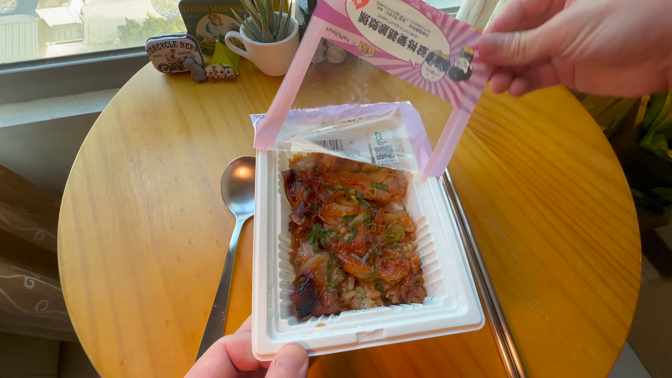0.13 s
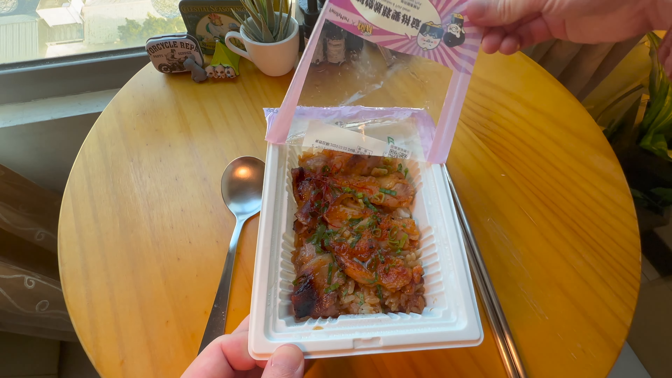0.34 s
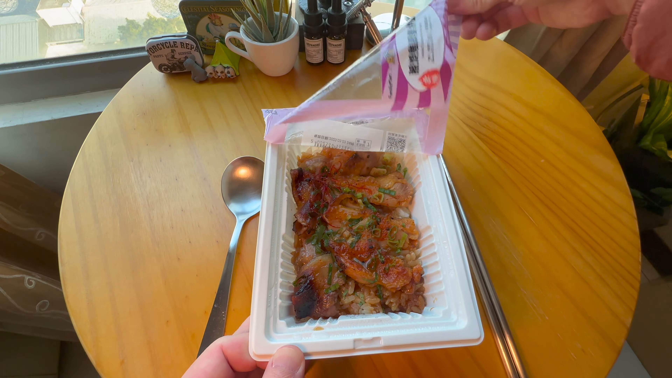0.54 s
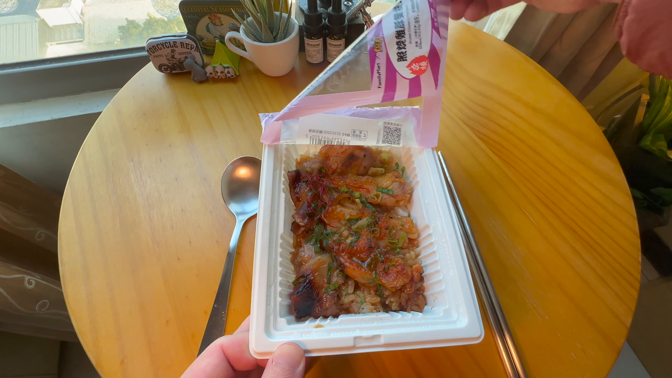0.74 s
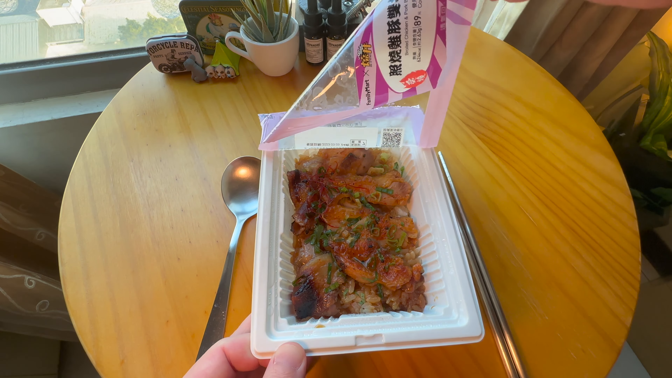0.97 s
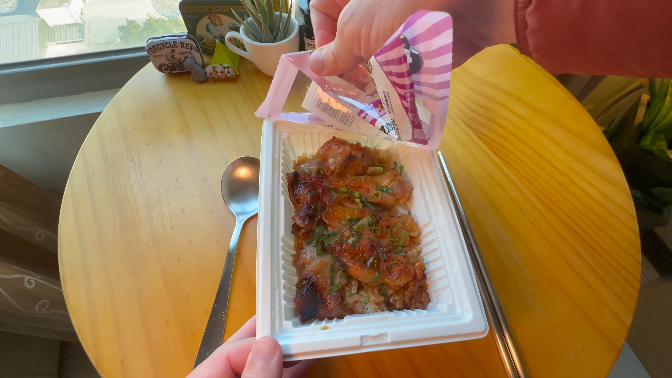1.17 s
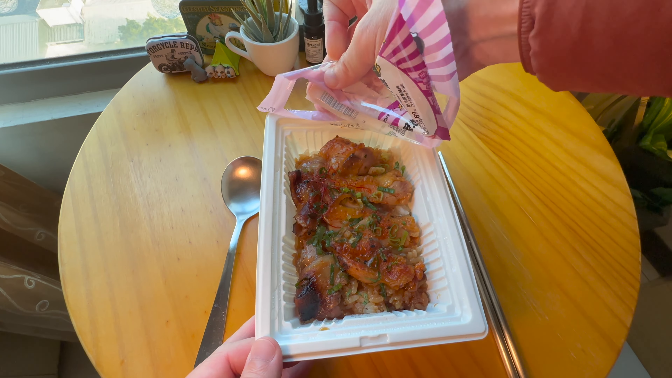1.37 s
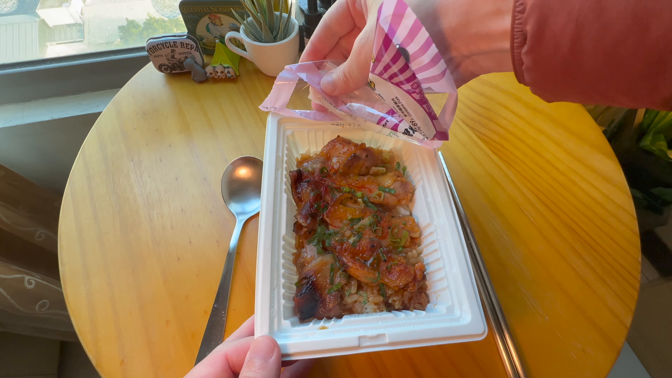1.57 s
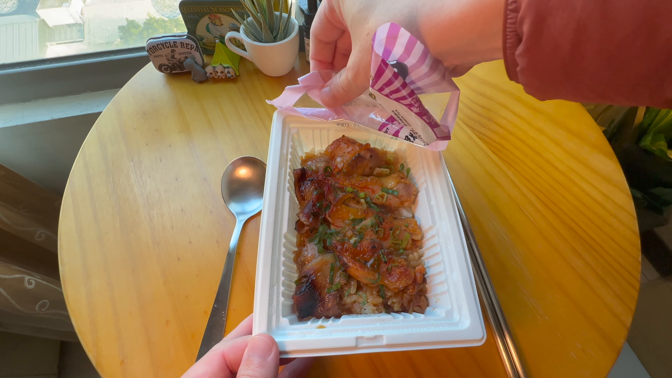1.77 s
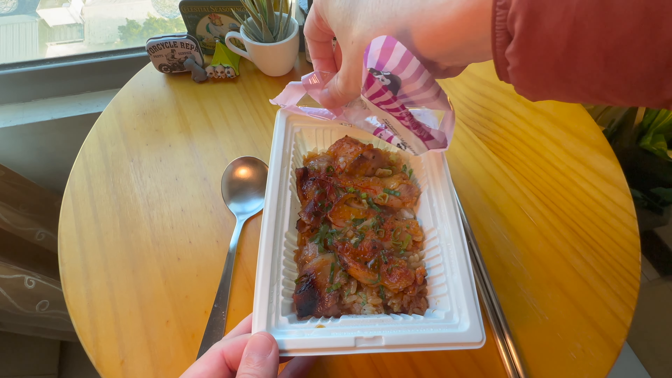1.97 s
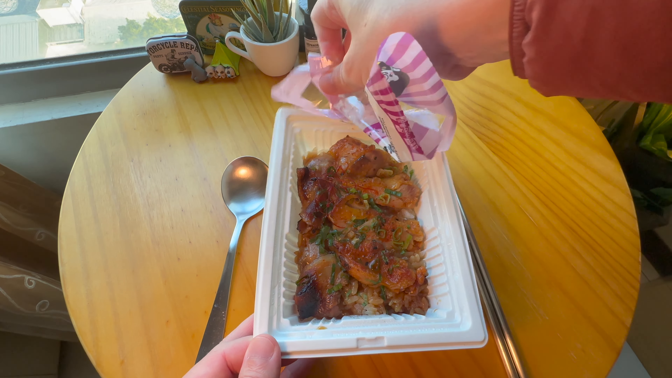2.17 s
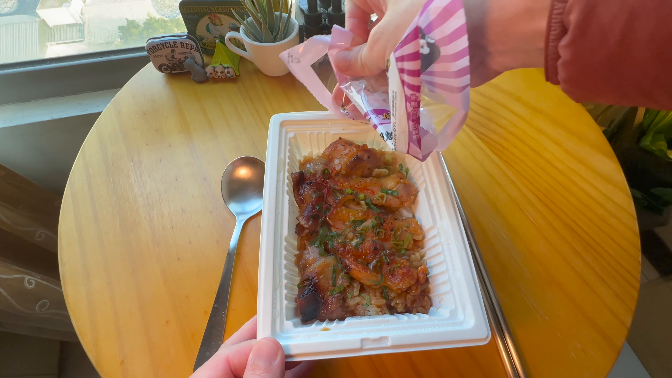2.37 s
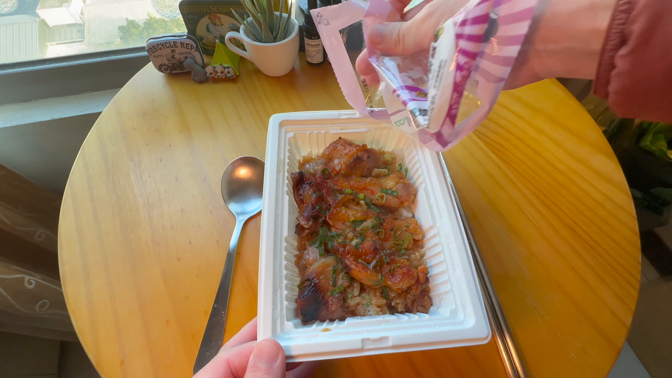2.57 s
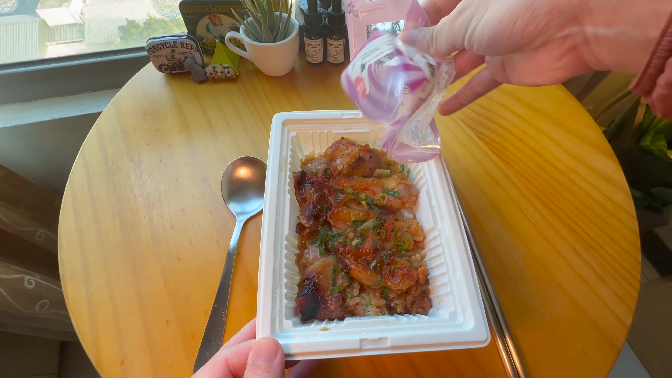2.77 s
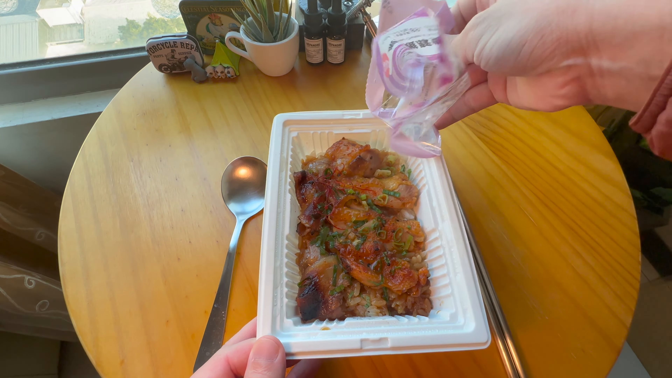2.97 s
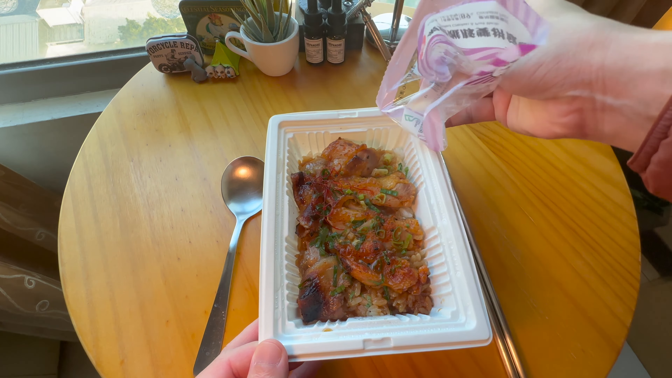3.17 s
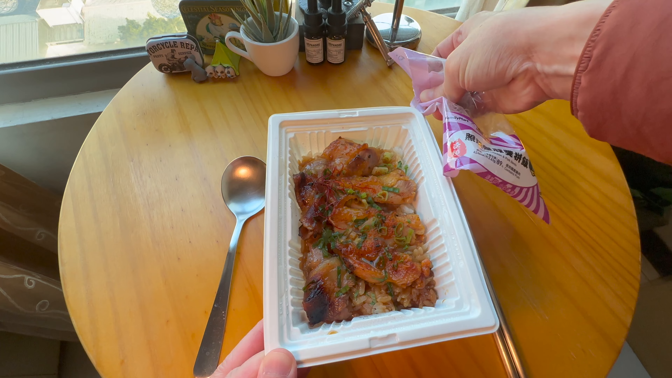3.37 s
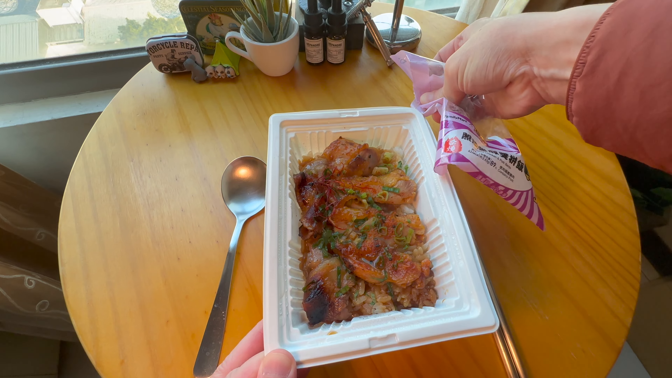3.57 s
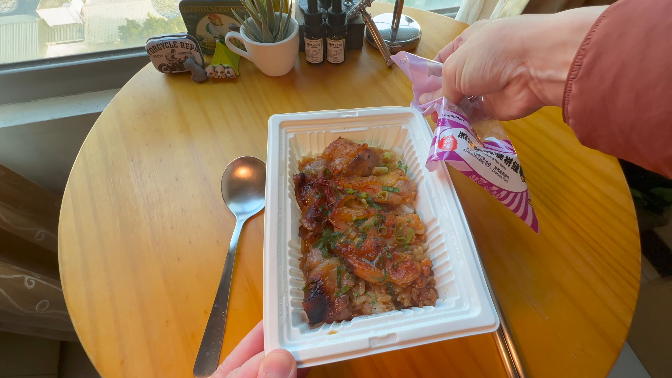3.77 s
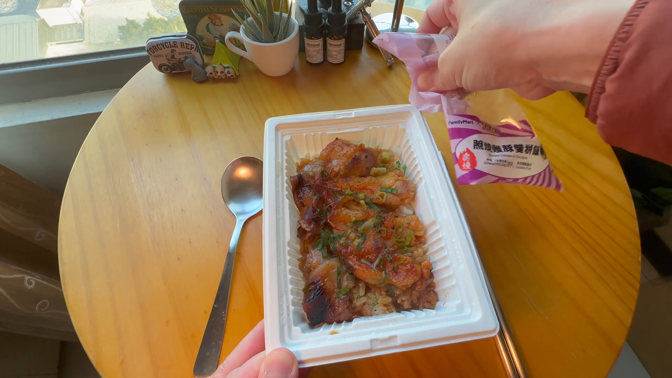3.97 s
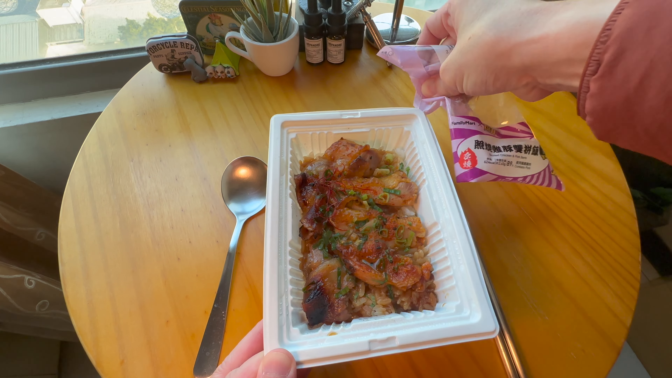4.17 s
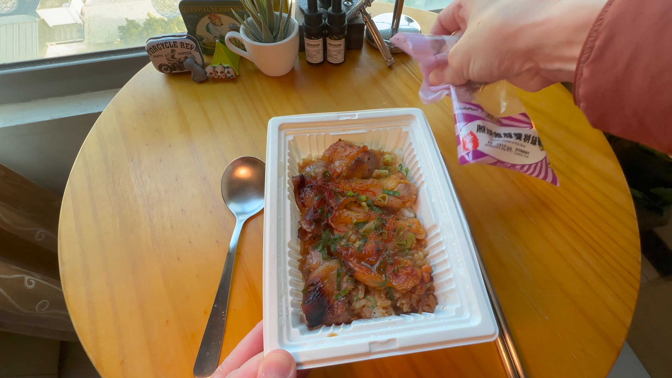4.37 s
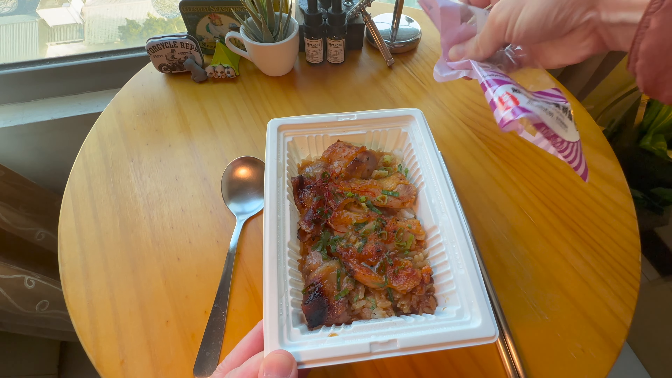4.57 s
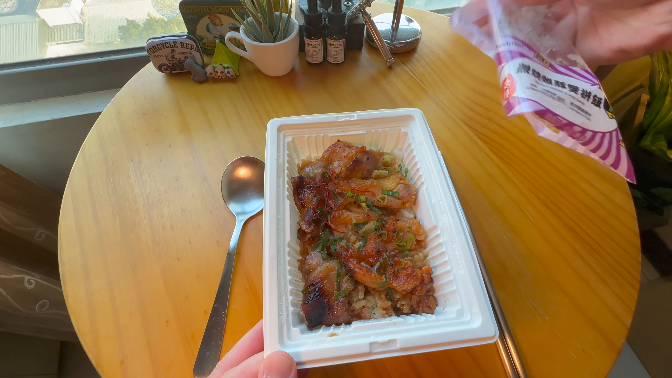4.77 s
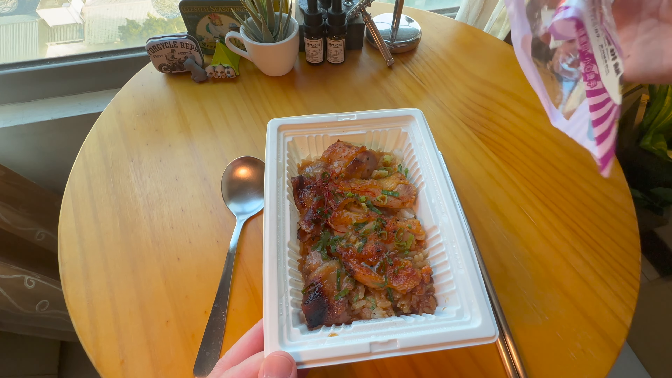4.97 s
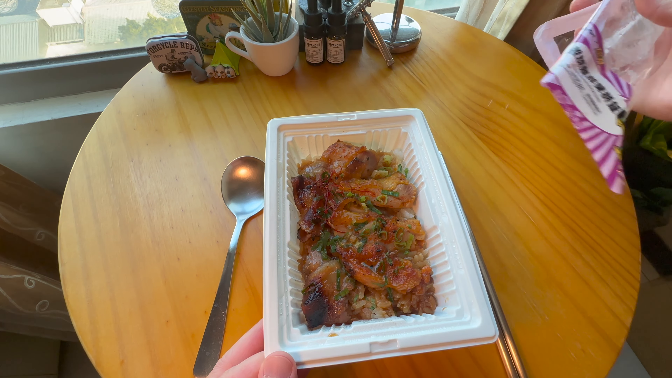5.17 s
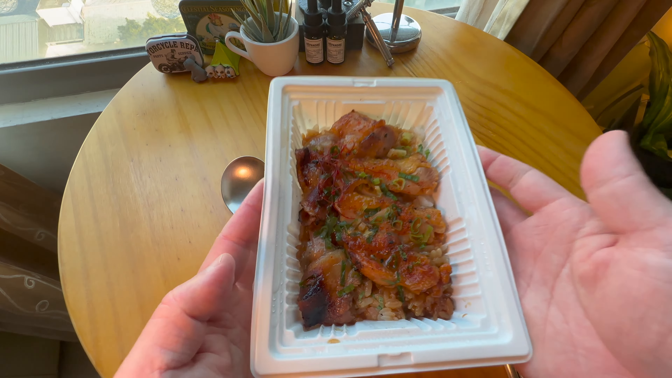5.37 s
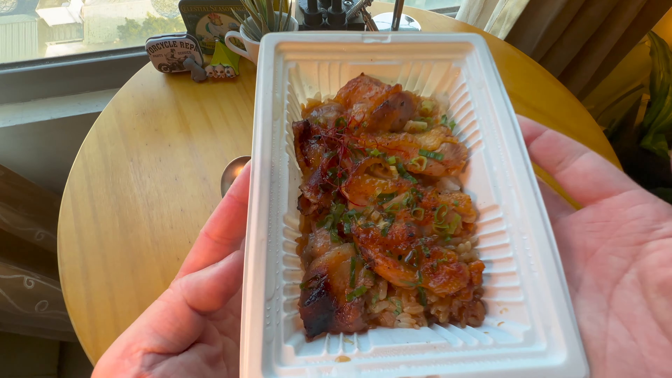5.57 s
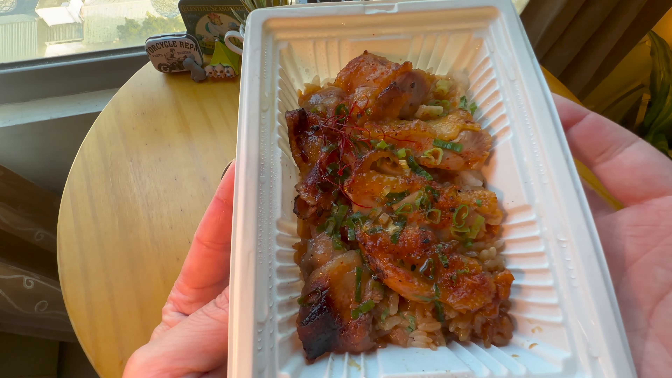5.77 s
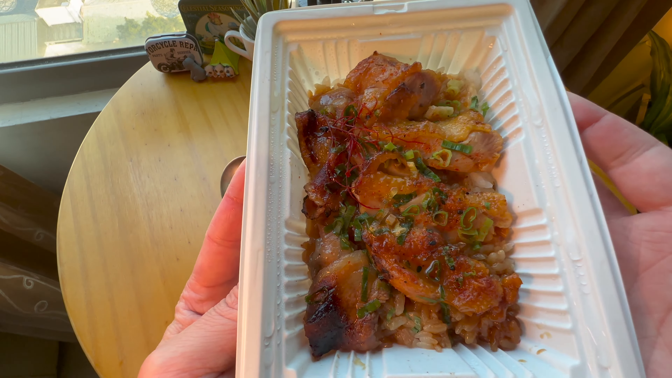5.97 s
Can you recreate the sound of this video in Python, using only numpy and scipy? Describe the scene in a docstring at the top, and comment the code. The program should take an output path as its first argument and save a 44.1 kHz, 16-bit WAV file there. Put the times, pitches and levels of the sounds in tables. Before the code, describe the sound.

A close stereo microphone in a small, dry room with faint low traffic rumble. At 0.15 s a loud, bright plastic snap breaks out of a scratchy rustle as film peels from a tray, with another snap at 0.25. Lighter clicks follow around 0.5 to 1.1 s. From about 1.25 to 2.7 s the film is crumpled: dense, irregular, sharp crackles and papery rustle, strongest near 1.4, 1.7, 2.0 to 2.3 and 2.57 s, with dull tray thumps, a low table wobble near 2.2 and small muffled clunks. Crackling thins until 3.35 s, with crisp snaps near 3.15. A near pause follows, only soft clunks and rumble. At 3.95 to 4.12 s a few dry clicks come, while a very faint distant motor whine rises; a duller knock lands at 4.33. Sparse weak ticks and small scratches run from 4.55 to 5.16 s, then soft handling rustle and low rumble remain until 6 s.

```python
"""A small room with a wooden table by a window: a thin plastic film is peeled from a food tray, crumpled and put aside.
Every crease that buckles snaps (shaped noise bursts), rings a patch of film and pushes the tray (damped resonances).
Finer creases crackle, film and fingers rustle (modulated noise); rips and rubs are short resonant scrapes.
The table knocks (decaying modes), the room answers (decaying noise), traffic rumbles and a far motor whines.
A camera mount clunks; two close microphone ports differ in level and phase."""
import sys
import numpy as np
from scipy import signal
from scipy.fft import rfft, irfft, next_fast_len
from scipy.io import wavfile
from scipy.ndimage import uniform_filter1d, map_coordinates

SR = 44100
rng = np.random.default_rng(int(sys.argv[2]) if len(sys.argv) > 2 else 0)


def store_wav(level_fs):
    """Save 16-bit WAV to argv[1]."""
    pcm = np.round(np.clip(np.atleast_2d(level_fs), -1, 1) * 32767)
    wavfile.write(sys.argv[1], SR, pcm.T.astype(np.int16))


N = 265482


def amp(db):
    """Level to amplitude ratio: 20 dB is a factor of ten."""
    return 10 ** (np.asarray(db) / 20)


def unit(x):
    """Power normalisation to rms 1."""
    return x / np.sqrt(np.mean(x ** 2) + 1e-20)


def peak_one(rows):
    """Peak normalisation of every row."""
    return rows / np.abs(rows).max(axis=-1, keepdims=True)


def along(points, hz):
    """Interpolation of (frequency, value) points on a logarithmic frequency axis."""
    f, v = np.transpose(points)
    return np.interp(np.log(hz + 1), np.log(f + 1), v)


def curves(rows):
    """Linear interpolation in time: one value per sample for each column after the time."""
    s, *cols = np.transpose(rows)
    return [np.interp(np.arange(N) / SR, s, c) for c in cols]


def wobble(rate):
    """Band-limited random modulation: a smooth curve through rate random knots a second."""
    knots = rng.standard_normal(int(N * rate / SR) + 4)
    return map_coordinates(knots, [np.arange(N) * rate / SR])


def filtered(x, response):
    """Linear filtering: the spectrum of x times a complex response of frequency."""
    n = x.shape[-1]
    m = next_fast_len(n + 8192)
    return irfft(rfft(x, m) * response(np.fft.rfftfreq(m, 1 / SR)), m)[..., :n]


def causal(spectrum):
    """Minimum phase by the folded cepstrum: a response of this colour that starts only at the blow."""
    def response(hz):
        cepstrum = irfft(np.log(amp(along(spectrum, hz)) + 1e-4))
        cepstrum[1:len(hz) - 1] *= 2
        cepstrum[len(hz):] = 0
        return np.exp(rfft(cepstrum))
    return response


def resonance(hz, centre_hz, width_hz):
    """Damped harmonic oscillator: the response of one mode."""
    return 1j * hz * width_hz / (centre_hz ** 2 - hz ** 2 + 1j * hz * width_hz)


def placed(sounds, s, lead=0):
    """Superposition: every row is added at its time, lead samples early."""
    at = (np.round(s * SR).astype(int) + np.arange(sounds.shape[-1])).ravel()
    return np.bincount(at, sounds.ravel(), N + SR)[lead:N + lead]


# Snapping creases: t/s, crack peak level/dB, patch ring peak level/dB, patch pitch f/Hz,
# peak level of the push on the tray/dB; all levels before the table's echo
SNAPS = [(0.133, -41, -30.5, 1370, -31), (0.1489, -6, -14, 1410, -24), (0.177, -19, -21, 1880, -34),
         (0.248, -13, -21.5, 2480, -35), (0.376, -35, -31.5, 3070, -40), (0.509, -30, -30, 1800, -40.5),
         (0.525, -51, -30, 3460, -43), (0.5611, -57, -31, 2340, -39.5), (0.7395, -39, -29.5, 2470, -37),
         (0.7567, -27.5, -30.5, 3270, -44), (0.785, -35, -33, 1790, -55), (0.795, -19, -23.5, 2060, -41.5),
         (0.8221, -38, -29, 1960, -36.5), (0.9322, -20, -24.5, 2670, -45), (0.9666, -35, -35, 1530, -43.5),
         (1.0322, -39, -33.5, 1590, -68), (1.072, -31.5, -43, 3240, -54), (1.0978, -17, -33, 1200, -49),
         (1.1624, -29, -32, 2700, -30.5), (1.1681, -24, -30, 1590, -35), (1.2042, -48, -33, 2950, -46),
         (1.2747, -20.5, -20.5, 2680, -27.5), (1.296, -18.5, -28, 1590, -33.5),
         (1.304, -22, -25, 3940, -51), (1.31, -32, -37.5, 1280, -38), (1.324, -28.5, -27, 1520, -29.5),
         (1.335, -28, -26, 3100, -31.5), (1.376, -21, -33.5, 2950, -33), (1.389, -35, -27, 3070, -29),
         (1.4024, -16.5, -24, 1270, -28), (1.418, -12, -30, 1480, -27), (1.4216, -26, -14, 3100, -32),
         (1.451, -15.5, -21, 3000, -49), (1.457, -26, -17.5, 4560, -42), (1.5037, -14.5, -25.5, 2980, -45),
         (1.541, -28.5, -28.5, 2830, -56), (1.586, -30.5, -30, 3110, -79), (1.6153, -40, -36.5, 1030, -34),
         (1.63, -13, -14.5, 2660, -33.5), (1.641, -44, -32, 3200, -51), (1.658, -48, -42, 1930, -38),
         (1.673, -46, -27.5, 1520, -36), (1.686, -19, -30, 1690, -54), (1.6943, -28, -24, 1640, -27),
         (1.701, -24, -35.5, 3160, -32), (1.706, -14, -20, 3240, -27.5), (1.714, -9, -23.5, 3180, -39),
         (1.732, -38, -52, 1180, -38), (1.7384, -11, -16, 1390, -24.5), (1.7862, -24, -29.5, 3040, -60),
         (1.7957, -29.5, -36.5, 3220, -37), (1.8963, -21.5, -23, 3230, -52),
         (1.9898, -20.5, -37.5, 3360, -32), (2.006, -7.5, -20.5, 1300, -29), (2.033, -24, -50, 960, -32),
         (2.0574, -15.5, -18, 3480, -46), (2.128, -24, -29, 1770, -40), (2.1823, -9.5, -29.5, 775, -17.5),
         (2.191, -23, -16.5, 1660, -18.5), (2.2172, -15.5, -27, 1440, -20.5),
         (2.243, -11, -13.5, 1650, -28), (2.2604, -20, -20.5, 3430, -45), (2.2773, -14, -41.5, 1670, -40),
         (2.3257, -16.5, -24.5, 1410, -33), (2.4297, -23, -26, 1860, -31), (2.4361, -16, -18.5, 1680, -32),
         (2.44, -44, -19, 2300, -41), (2.473, -25, -37, 1550, -44.5), (2.4794, -22, -38, 1920, -35),
         (2.5014, -14, -36, 1150, -32), (2.506, -51, -21, 2560, -30), (2.521, -46, -23.5, 1570, -27),
         (2.5695, -4.5, -17.5, 1470, -26), (2.575, -17.5, -19.5, 1500, -31), (2.6195, -36, -55, 960, -52),
         (2.638, -28, -27, 1500, -43), (2.642, -22, -24.5, 3560, -48), (2.6477, -10.5, -26, 1330, -30),
         (2.663, -31, -27, 2350, -34.5), (2.699, -32, -31, 2030, -36.5), (2.732, -37, -37.5, 1160, -50.5),
         (2.745, -42, -39.5, 1710, -32), (2.756, -47, -30, 2730, -47), (2.7763, -28.5, -26, 2330, -40),
         (2.803, -62, -31, 1690, -56), (2.8343, -59, -35.5, 1890, -51), (2.865, -40, -33, 2420, -79),
         (2.899, -25.5, -23, 2840, -51), (2.913, -32, -30, 2420, -33), (2.9507, -34, -36, 1750, -44),
         (2.9596, -21, -26, 1310, -39), (2.968, -36, -31, 1610, -38.5), (2.9888, -42, -33, 1600, -40.5),
         (3.0736, -56, -34.5, 1680, -36.5), (3.09, -58.5, -33, 1630, -67),
         (3.121, -18.5, -21.5, 1360, -28.5), (3.175, -20.5, -14, 3060, -30),
         (3.2047, -24.5, -23, 3140, -33), (3.2461, -60, -38.5, 2660, -39.5),
         (3.266, -61, -37.5, 2620, -49.5), (3.341, -35.5, -39, 1006, -41), (3.9494, -22, -35, 1156, -61),
         (3.956, -27, -42, 2080, -64), (3.975, -17, -19, 1460, -44), (4.062, -46, -37.5, 1590, -60),
         (4.0934, -19, -31, 1720, -63), (4.1111, -18.5, -21, 1350, -60), (4.123, -16.5, -27.5, 1930, -45.5),
         (4.331, -25.5, -28.5, 1060, -25.5), (4.5466, -38.5, -44, 2330, -70), (4.566, -70, -50, 920, -44.5),
         (4.588, -44, -40, 1220, -46), (4.6265, -34, -43, 2160, -41), (4.6472, -27.5, -34.5, 1300, -58),
         (4.668, -49, -60, 960, -41), (4.7003, -27.5, -32.5, 844, -45.5), (4.7231, -28.5, -41, 1180, -39.5),
         (4.7357, -26.5, -53, 1020, -46), (4.7771, -24.5, -53, 1380, -41), (4.8028, -40, -33, 2270, -38.5),
         (4.8571, -16.5, -36, 2500, -50), (4.865, -33, -50, 2700, -66), (5.0012, -35, -33.5, 2250, -53.5),
         (5.0354, -29, -38, 1820, -53.5), (5.0897, -40, -52, 1310, -50), (5.163, -67, -46.5, 910, -52.5)]
# Colour of a crack: f/Hz, spectral level/dB
CRACK_SPECTRUM = [(1800, -16.5), (3000, 7), (4600, 1.5), (8700, 3.5), (10500, 1.5), (11300, -3.5),
                  (12500, -16.5), (15300, 5), (16900, -28.5)]
# Tray modes driven by a push: f/Hz, width/Hz, level/dB
TRAY_MODES = [(192, 77, -7), (296.8, 32, -1), (701, 141, -1.5)]
# How far a snap differs between the ports: f/Hz, level under the snap/dB
PORT_DIFFERENCE = [(1200, -35), (2500, -13.5), (4500, -3), (7000, -17), (12000, -14.5)]
# Shiver of a middling snap that pushes as hard as it sounds; its length in dB per dB of push
SHIVER_MS, SHIVER_GROWS = 5.47, 0.38
# dB shorter per dB of loudness over a middling snap
SHARP_GROWS, MIDDLING_DB = 0.078, -25
# From ASIDE_S the film moves off to the side for one second: total dB more uneven, total dB of the top octave
ASIDE_S, ASIDE_DB, VEIL_DB = 3.75, 13, -11


def snaps():
    """Snap-through buckling: a crease creaks, flips over in one sharp step and shivers; the table top echoes it.
    Gives what both ports share and what differs, since every crease faces its own way."""
    s, crack_db, ring_db, ring_hz, push_db = np.transpose(SNAPS)[..., None]
    loud_db = np.maximum(crack_db, ring_db)
    # heavy, dull creases shiver longer; strong ones are abrupt
    longer_db = SHIVER_GROWS * (push_db - loud_db) - SHARP_GROWS * (loud_db - MIDDLING_DB)
    shiver_ms = SHIVER_MS * amp(longer_db)

    lead = round(.008 * SR)  # room for the creak before the flip
    t = (np.arange(SR // 25) - lead) / SR
    step, shiver = rng.standard_normal((len(s), 2, len(t))).transpose(1, 0, 2)
    step_decay = amp(-60 * np.abs(t) / 0.0061) + 0.87 * amp(-60 * np.abs(t) / 0.0029)
    step = step * (t >= 0) * step_decay * (1 - np.exp(-np.abs(t) / 0.00012))
    shivers = 1000 * t / shiver_ms  # time in shiver lengths
    creak_rise = 0.53 * amp(47 * shivers)
    shiver_decay = amp(-9 * shivers) + 0.2 * amp(-60 * t / 0.084)
    shiver = shiver * np.where(t < 0, creak_rise, shiver_decay)
    dull = lambda hz: np.where(hz < 11500, 1, amp(-13.5))  # the shiver is weak in the top octave
    flip = step + 0.091 * shiver_ms * filtered(shiver, dull)  # long shivers drown the step

    tight = np.clip((crack_db - ring_db) / 12, -1, 1)  # a tight crease rings little and cracks brighter
    tilt = lambda hz: amp(5.5 * tight * np.log2(np.clip(hz, 3000, 10000) / 6000))
    aside = np.clip(s - ASIDE_S, 0, 1)
    veil_db = VEIL_DB * (aside + 2 * (s < .6))  # the raised sheet also hides the first creases
    veiled = lambda hz: np.where(hz < 11500, 1, amp(veil_db))
    edge_hz = 6500 * np.exp(0.4 * rng.standard_normal((len(s), 4, 1)))  # four bright rings for each crease
    edge = lambda hz: 1 + 1.2 * resonance(hz, edge_hz, 0.1 * edge_hz).sum(axis=1)
    crack_colour = causal(CRACK_SPECTRUM)
    crack = peak_one(filtered(flip, lambda hz: crack_colour(hz) * tilt(hz) * edge(hz) * veiled(hz)))

    patch = lambda hz: resonance(hz, ring_hz, 0.27 * ring_hz) * resonance(hz, 1500, 4400)
    ring = peak_one(filtered(flip, patch))
    tray = lambda hz: sum((-1) ** k * amp(level_db) * resonance(hz, centre_hz, width_hz)
                          for k, (centre_hz, width_hz, level_db) in enumerate(TRAY_MODES))
    push = peak_one(filtered(flip, tray))
    sound = amp(crack_db) * crack + amp(ring_db) * ring + amp(push_db) * push

    facing = 1j * rng.standard_normal((len(s), 1)) * amp(ASIDE_DB * aside)  # one port hears it earlier
    uneven = filtered(sound, lambda hz: facing * amp(along(PORT_DIFFERENCE, hz)))
    direct = np.array([placed(part, s, lead) for part in (sound, uneven)])
    table_echo = np.pad(direct, ((0, 0), (round(0.0025 * SR), 0)))[:, :N]
    return direct + amp(-17.0) * table_echo


def scrapes(rows, rough_db):
    """Stochastic excitation of a resonator: lumpy noise swells and sinks through one twice-applied resonance."""
    s, length, db, centre_hz, width = np.transpose(rows)[..., None]
    t = np.arange(-SR // 20, SR // 20) / SR
    noise, lumps = rng.standard_normal((len(s), 2, len(t))).transpose(1, 0, 2)
    lumps = amp(rough_db * unit(uniform_filter1d(lumps, size=40, axis=1)))
    swell = np.cos(np.pi * np.clip(t / length, -.5, .5)) ** 2
    resonator = lambda hz: resonance(hz, centre_hz, width * centre_hz) ** 2
    sound = amp(db) * peak_one(filtered(noise * lumps * swell, resonator))
    return placed(sound, s, SR // 20)


# Creases that roll over raggedly: middle t/s, length/s, peak level/dB, centre f/Hz, width as share of centre
RIPS = [(.1495, 0.0034, -15, 8700, 0.17), (1.075, .05, -46, 3280, 0.33), (1.107, 0.0137, -25, 5800, .5),
        (1.11, 0.0196, -27.5, 2770, 1.3), (1.3768, 0.0041, -8, 14000, 0.91),
        (1.613, 0.025, -27.5, 6200, 2.3), (4.603, 0.0275, -41, 7500, 0.55), (4.665, 0.064, -41.5, 3000, 2),
        (4.742, 0.0114, -38, 7500, .8), (4.758, 0.0095, -29.5, 7900, 0.43)]


def rips():
    """Progressive buckling: a crease rolls over in a ragged flurry instead of one step."""
    return scrapes(RIPS, rough_db=3.5)


# Small creases from low to high: f/Hz, width/Hz, level/dB
SMALL_CREASES = [(1262, 1300, -9.5), (2992, 1680, -11), (6360, 5500, -12)]


def crackle(film):
    """Stress redistribution: small creases give way shortly before each film sound and longer after it."""
    t = np.arange(-SR // 5, SR // 5 + 1) / SR
    spread = np.where(t < 0, amp(60 * t / 0.025), amp(-60 * t / 0.062))
    power = signal.fftconvolve(film ** 2, spread ** 2 / np.sum(spread ** 2), "same")
    stress = np.sqrt(np.abs(power))
    centre_hz, width_hz, db = np.transpose(SMALL_CREASES)[..., None]
    shape = (len(SMALL_CREASES), N)
    sizes = amp(2.26 * np.minimum(rng.exponential(1, shape), 2.5))
    gives = (rng.random(shape) < 150 / SR) * sizes  # 150 a second of each kind
    fade = amp(-60 * np.arange(SR // 100) / SR / 0.0078)
    flutter = signal.fftconvolve(gives, fade[None], axes=1)[:, :N] * rng.standard_normal(shape)
    rings = filtered(flutter, lambda hz: resonance(hz, centre_hz, width_hz) ** 2)
    return stress * amp(-2) * sum(amp(level_db) * unit(ring) for level_db, ring in zip(db, rings))


# The tray's rim on the table: middle t/s, length/s, peak level/dB, centre f/Hz, width as share of centre
RUBS = [(2.312, 0.046, -37, 522, 0.29), (4.432, 0.041, -53, 523, 0.28), (4.495, 0.022, -51.5, 510, 0.23)]


def rim_rubs():
    """Friction-driven vibration: the tray's rim rubs on the table."""
    return scrapes(RUBS, rough_db=5.5)


def grit(per_s, spread_db, share):
    """Clustered shot noise: two noises roughened by tiny creases that come in clumps."""
    chance = per_s / SR * amp(3.8 * wobble(40))
    sizes = (rng.random(N) < chance) * amp(spread_db * np.minimum(rng.exponential(1, N), 4))
    fade = amp(-60 * np.arange(SR // 50) / SR / 0.019)
    swell = signal.fftconvolve(sizes, fade)[:N]
    share = np.clip(share, 0, 1)
    return rng.standard_normal((2, N)) * (1 - share + share * unit(np.abs(swell)))


def patchy(pair, depth_db):
    """Time-frequency modulation: the level of a noise drifts in small patches of time and pitch."""
    z = signal.stft(pair, nperseg=1024)[2]
    field = uniform_filter1d(rng.standard_normal(z.shape[1:]), size=3, axis=0)
    field = uniform_filter1d(field, size=6, axis=1)
    return signal.istft(z * amp(depth_db * unit(field)), nperseg=1024)[1][:, :N]


# Likeness of the ports in a diffuse field: f/Hz, left-right correlation
PORT_LIKENESS = [(90, 1), (150, 0.99), (290, 0.94), (640, 0.15), (1150, 0.57), (1750, 0.91), (3000, 0.62),
                 (5000, 0.27), (7000, 1), (15000, 1)]


def diffuse(pair, spectrum):
    """Diffuse-field coherence: two noises, coloured, make a shared and an opposed part; shared part at rms 1."""
    def split(hz):
        turn = np.arccos(np.clip(along(PORT_LIKENESS, hz), -1, 1)) / 2
        return amp(along(spectrum, hz)) * [np.cos(turn), np.sin(turn)]
    mid, side = filtered(pair, split)
    return np.array([mid + side, mid - side]) / np.sqrt(np.mean(mid ** 2))


SHAKE_RISE_S, SHAKE_T60_S = 0.03, 0.22  # 60 dB rise before a push, 60 dB fall after it


def shaken(steady_db, shake_db):
    """Energy summation: gain of a layer from its steady level and the tray's shaking around every push."""
    s, *_, push_db = np.transpose(SNAPS)
    t = np.arange(-SR // 2, SR // 2 + 1) / SR
    swell = np.where(t < 0, amp(60 * t / SHAKE_RISE_S), amp(-60 * t / SHAKE_T60_S))
    pushes = np.bincount(np.round(s * SR).astype(int), amp(push_db + shake_db) ** 2, N)
    shaking = np.abs(signal.fftconvolve(pushes, swell ** 2, "same"))
    return np.sqrt(amp(steady_db) ** 2 + shaking)


# Film and fingers sliding: t/s, steady body level/dB, steady hiss level/dB
SLIDING = [(0, -41, -47), (.12, -36.5, -49), (.2, -43, -48.5), (.3, -55.5, -56), (.43, -60, -64),
           (.56, -47.5, -58), (.7, -74, -73.5), (1.03, -59, -60), (1.09, -57, -54.5), (1.25, -59, -67.5),
           (1.4, -54, -47.5), (1.58, -66, -64), (1.7, -69.5, -64), (1.95, -61.5, -63), (2.4, -62.5, -62.5),
           (2.66, -48.5, -48), (2.85, -59, -68), (3.23, -55, -62.5), (3.38, -75, -74), (3.9, -72.5, -74),
           (4.05, -65.5, -62), (4.45, -71, -72.5), (4.76, -66.5, -59.5), (5.23, -74, -74.5),
           (5.31, -71.5, -64), (5.8, -63, -59.5), (5.89, -73.5, -67.5), (6.02, -72, -69)]
# Colour of the rustle's body: f/Hz, spectral level/dB
BODY_SPECTRUM = [(400, -15), (580, -6.5), (700, 2), (900, -5), (1420, -3), (2640, -9.5), (3570, -17.5),
                 (4500, -23.5), (9900, -120)]
# Colour of its hiss: f/Hz, spectral level/dB
HISS_SPECTRUM = [(2060, -27), (3500, -11.5), (5930, -8.5), (7350, -7.5), (8510, -8.5), (10100, -11.5),
                 (10900, -11.5), (14200, -53), (22000, -120)]
HISS_TOP_HZ = 11000
SHAKE_BODY_DB, SHAKE_HISS_DB = -27.5, -26.5  # what the shaking adds, relative to the push


def rustle():
    """Friction noise: glue lets go, film and fingers slide in a dense crackle that follows the hands."""
    body_db, hiss_db = curves(SLIDING)
    busy = np.clip((body_db + 82) / 15, 0, 1)  # harder handling is grainier
    pair = grit(per_s=920, spread_db=-0.5, share=0.38 * busy)
    pair = patchy(pair, depth_db=2.5)  # the sheet favours other pitches as it bends
    body = diffuse(pair, BODY_SPECTRUM)
    hiss = filtered(diffuse(pair, HISS_SPECTRUM), lambda hz: hz < HISS_TOP_HZ)
    return shaken(body_db, SHAKE_BODY_DB) * body + shaken(hiss_db, SHAKE_HISS_DB) * hiss


def knocks(events, modes):
    """Modal synthesis: each knock rings the same few modes, a little differently every time."""
    s, db = np.transpose(events)[..., None]
    t = np.arange(SR // 5) / SR
    vary = rng.standard_normal((len(s), len(modes), 2))
    ring = 0
    for k, (hz, level_db, t60) in enumerate(modes):
        decay = amp(level_db + 1.0 * vary[:, k, :1] - 60 * t / t60)
        ring = ring + decay * np.sin(2 * np.pi * hz * (1 + 0.03 * vary[:, k, 1:]) * t)
    return placed(amp(db) * ring * (1 - np.exp(-t / 0.0047)), s)


# The tray bumps the table top: t/s, level/dB
BUMPS = [(.2, -37.5), (.745, -36), (1.325, -29), (4.333, -29.5), (4.89, -57.5)]
# Table top modes: f/Hz, level/dB, t60/s
TABLE_MODES = [(61.7, -14.5, 0.12), (192, -3, 0.12), (281, 2, 0.088), (361.5, -8.5, 0.1)]


def table_bumps():
    """Impact excitation of a plate: the tray bumps the table top."""
    return knocks(BUMPS, TABLE_MODES)


# The whole table rocks once: t/s, level/dB
ROCK = [(2.2, -37)]
# Its mode: f/Hz, level/dB, t60/s
ROCKING_MODE = [(50.3, 0, 0.46)]


def table_rock():
    """Rigid-body oscillation: the whole table rocks once."""
    return knocks(ROCK, ROCKING_MODE)


# The camera mount clunks: t/s, level/dB
CLUNKS = [(0.209, -44), (.809, -37.5), (1.247, -32), (2.027, -42), (2.273, -29.5), (2.374, -40),
          (2.528, -39), (2.659, -29.5), (2.91, -35), (2.965, -43), (3.042, -31), (3.125, -29),
          (3.207, -37.5), (3.349, -45), (3.437, -35.5), (3.591, -38.5), (3.763, -43), (3.998, -42.5),
          (4.783, -45), (4.888, -45)]
# Mount modes: f/Hz, level/dB, t60/s
MOUNT_MODES = [(146.7, -17, 0.26), (428, 9, 0.044), (575, -17, 0.025), (782, 3, 0.025)]


def mount_clunks():
    """Structure-borne sound: the housing rocks, so the right port moves against the left."""
    return knocks(CLUNKS, MOUNT_MODES) * np.array([[1], [-0.79]])


# Decay of the small room: f/Hz, t60/s
ROOM_DECAY = [(150, 0.63), (1000, 0.032), (4000, 0.14), (10500, 0.1), (11500, 0.0093)]


def room(x):
    """Statistical reverberation: noise in which each frequency dies at its own speed."""
    hz, t, z = signal.stft(rng.standard_normal((2, SR // 2)), SR, nperseg=256)
    decay = amp(-60 * t / along(ROOM_DECAY, hz)[:, None])
    tail = signal.istft(z * decay, SR, nperseg=256)[1]
    delayed = np.pad(x, (round(0.0069 * SR), 0))
    return signal.fftconvolve(delayed[None], tail / np.linalg.norm(tail[0]), axes=1)[:, :N]


# Low sound of table and street: t/s, steady boom level/dB, steady rumble level/dB
LOW = [(0.0, -57, -47.5), (0.15, -50, -45), (.24, -53, -50.5), (0.42, -61.5, -55.5), (0.79, -52.5, -56),
       (1.37, -56, -51.5), (2.06, -52.5, -54.5), (2.13, -82, -45), (2.2, -46, -56), (2.38, -56, -52),
       (3.22, -55.5, -54), (3.32, -71, -53.5), (3.42, -54.5, -55.5), (4.11, -69, -67), (4.45, -63.5, -60),
       (4.71, -62, -56.5), (5.08, -65, -69), (5.22, -59, -67), (5.32, -60, -60.5), (5.55, -60, -61.5),
       (5.78, -55, -53.5), (5.86, -61.5, -58.5), (6.02, -57, -57.5)]
# Colour of the boom: f/Hz, spectral level/dB
BOOM_SPECTRUM = [(25, -17), (50, -6), (78, 5), (115, -11.5), (160, -42.5), (400, -120)]
# Colour of the rumble: f/Hz, spectral level/dB
RUMBLE_SPECTRUM = [(70, -61), (120, 0), (290, -4.5), (450, -12), (560, -13.5), (800, -12.5), (950, -13.5),
                   (1150, -35.5), (2400, -120)]
# A far motor, before its random wobble: t/s, f/Hz, level/dB
WHINE = [(3.7, 760, -95), (3.98, 820, -70), (4.15, 890, -69), (4.28, 935, -69), (4.34, 950, -95)]
SHAKE_BOOM_DB, SHAKE_RUMBLE_DB = -27.5, -20  # what the shaking adds, relative to the push


def street():
    """Modulated noise and a gliding tone: table and traffic boom and rumble in lumps; a faint whine rises outside."""
    boom_db, rumble_db = curves(LOW)
    hz, db = curves(WHINE)
    phase = 2 * np.pi * np.cumsum(hz + 6 * wobble(40)) / SR
    whine = amp(db + 4.0 * wobble(30)) * np.sin(phase)
    boom = diffuse(rng.standard_normal((2, N)), BOOM_SPECTRUM)
    boom = shaken(boom_db, SHAKE_BOOM_DB) * amp(1.9 * wobble(4.06)) * boom
    rumble = diffuse(patchy(rng.standard_normal((2, N)), depth_db=3.0), RUMBLE_SPECTRUM)
    rumble = shaken(rumble_db, SHAKE_RUMBLE_DB) * amp(1.2 * wobble(17)) * rumble
    return boom + rumble + whine


def scene():
    """Superposition of sources: film, its room, the rustle, the street, the table and the mount."""
    film, uneven = snaps()
    film = film + rips()
    film = film + crackle(film) + rim_rubs()
    near = film + uneven * np.array([[1], [-1]]) + rustle()
    around = amp(-19.0) * room(film) + street()
    return near + around + table_bumps() + table_rock() + mount_clunks()


# Level difference of the ports: f/Hz, left over right level/dB
PORT_LEAN = [(70, 1), (200, 2.5), (380, 4.5), (700, -5), (1300, -0.5), (4400, 0.7), (15000, -0.5)]
# Phase difference of the ports: f/Hz, lag of the left port/rad
PORT_LAG = [(90, 0), (300, -.45), (600, .55), (1200, -.45), (1600, .05), (2600, .5), (3400, .8), (4200, .5),
            (5000, 1.5), (5700, .9), (8300, 1.6), (9500, 1.4), (11600, 2.3), (16000, 2.45)]
TOP_HZ = 17100  # band limit


def record(dry):
    """Interaural-style level and phase difference by frequency; nothing is kept above the band limit."""
    half = np.array([[1], [-1]]) / 2

    def ports(hz):
        level = amp(half * along(PORT_LEAN, hz))
        return level * np.exp(-1j * half * along(PORT_LAG, hz)) * (hz < TOP_HZ)
    return filtered(dry, ports)


dry = scene()
out = record(dry)
store_wav(out)
```